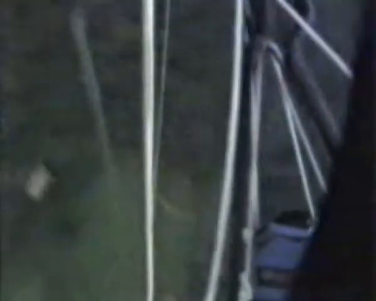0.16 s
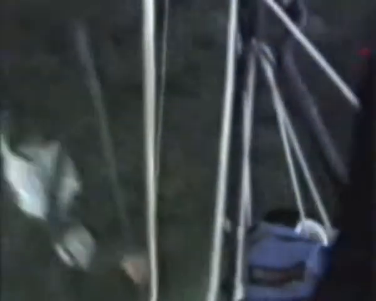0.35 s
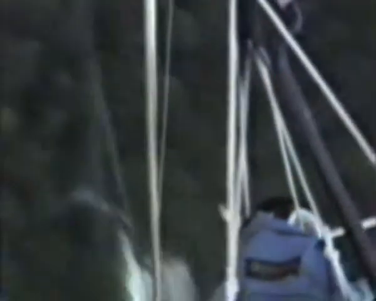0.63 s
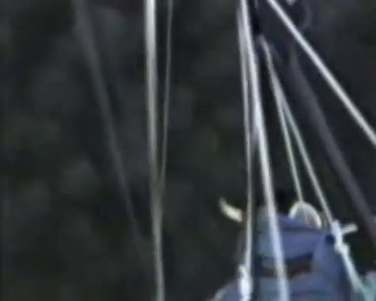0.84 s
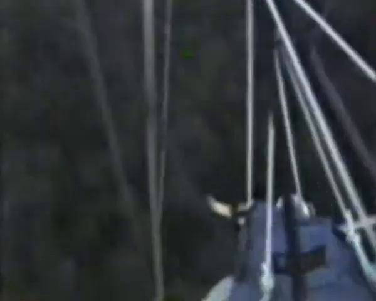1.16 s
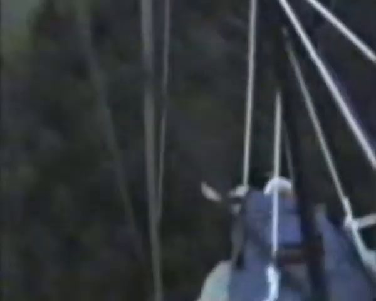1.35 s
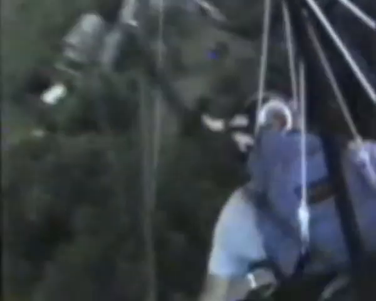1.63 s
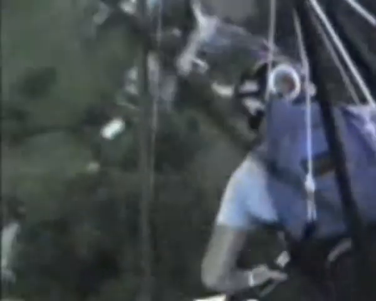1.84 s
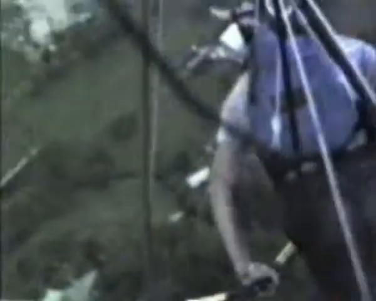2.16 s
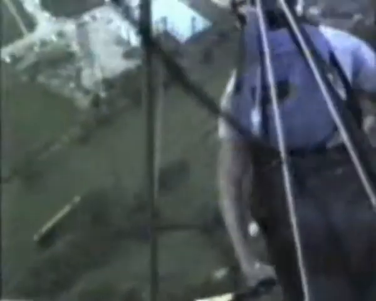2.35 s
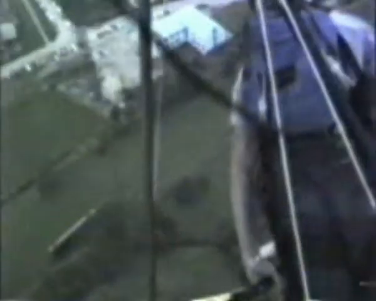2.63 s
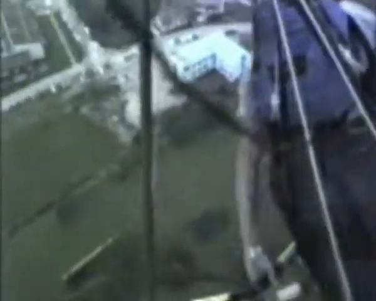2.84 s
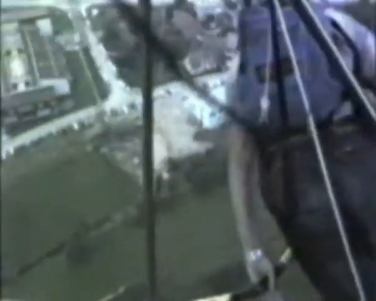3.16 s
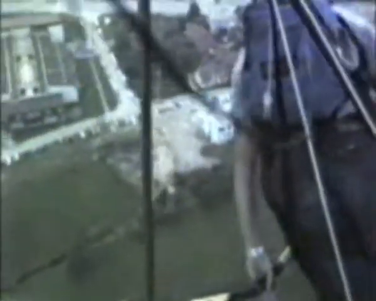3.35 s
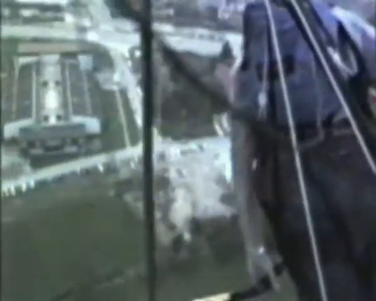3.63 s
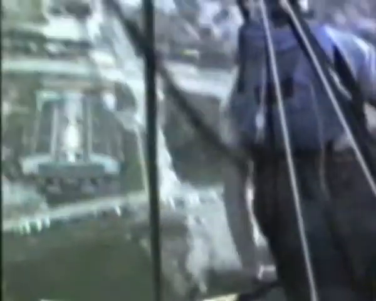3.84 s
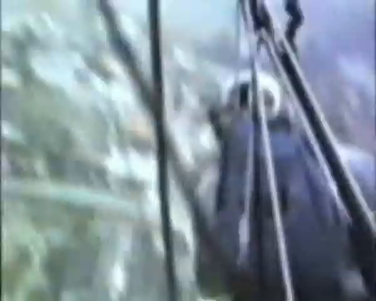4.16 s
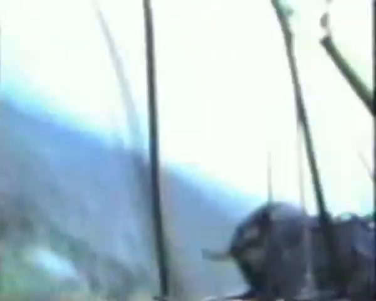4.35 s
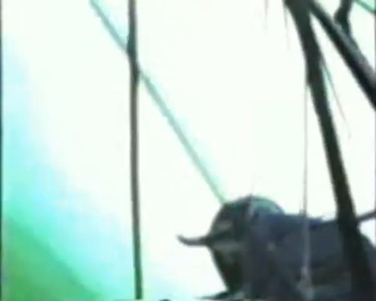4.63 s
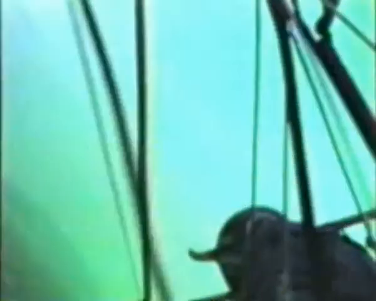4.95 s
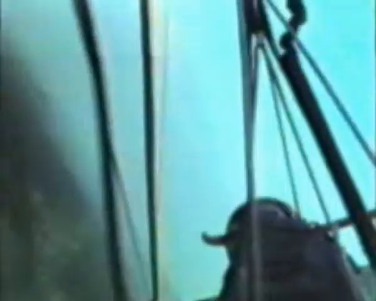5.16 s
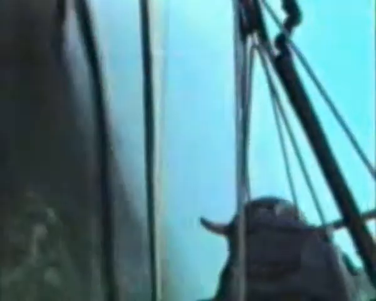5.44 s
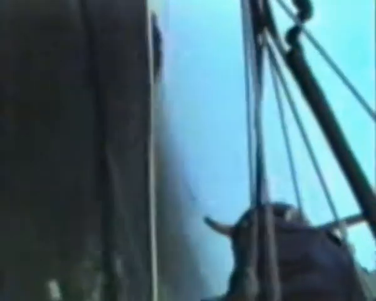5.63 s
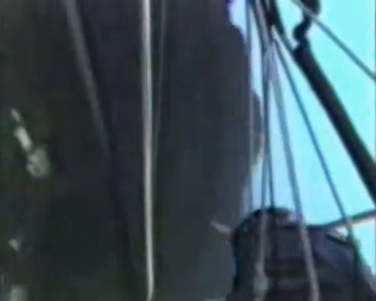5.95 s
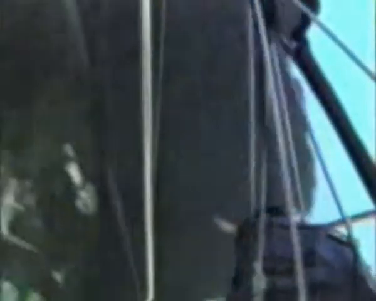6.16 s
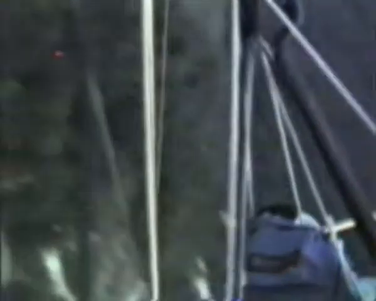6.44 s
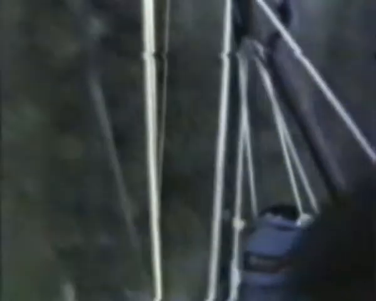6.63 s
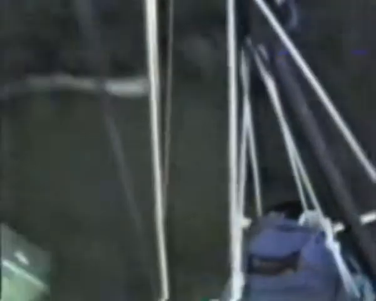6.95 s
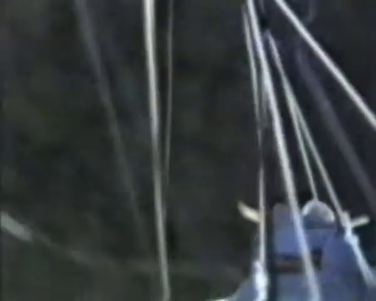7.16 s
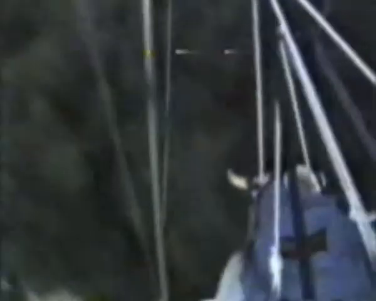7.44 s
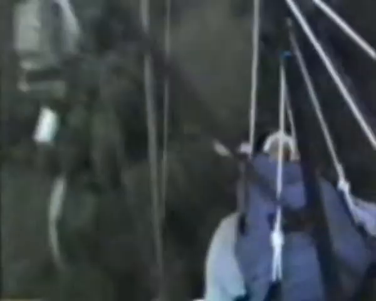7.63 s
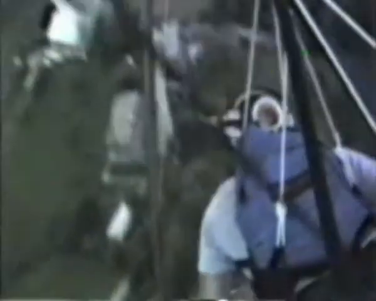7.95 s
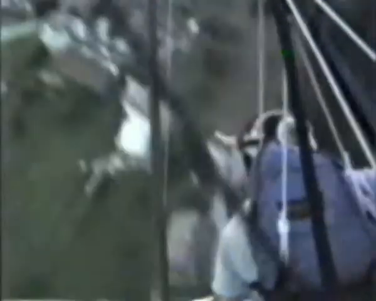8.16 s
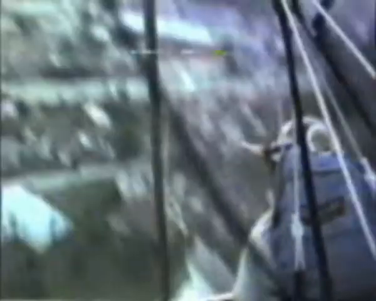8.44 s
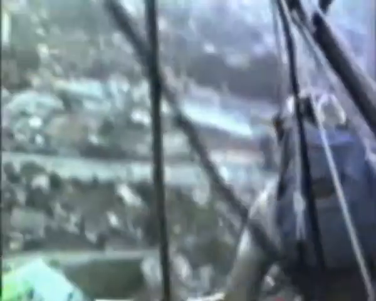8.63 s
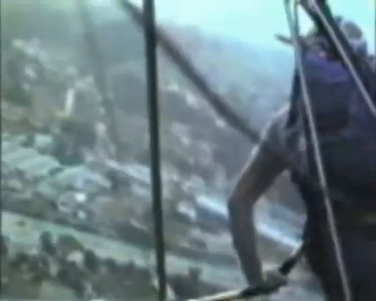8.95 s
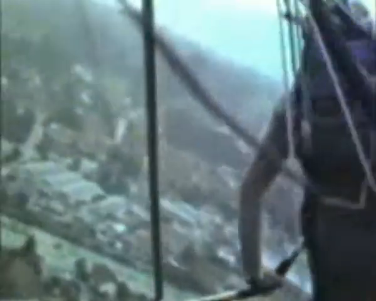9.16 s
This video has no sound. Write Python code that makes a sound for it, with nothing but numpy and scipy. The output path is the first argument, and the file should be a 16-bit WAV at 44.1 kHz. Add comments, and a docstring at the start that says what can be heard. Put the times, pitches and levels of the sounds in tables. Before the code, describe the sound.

Close, narrow-band rushing air, left channel only, flutters in fast irregular bursts. It grows brighter after three seconds, dulls near five, then a short hollow whistle catches while the low roar drops away. Breathy howling follows and the wind brightens again to the end. Open air, slightly overloaded microphone, with an almost silent, faintly hissing right side.

```python
"""On a hang glider swinging through steep turns, wind rushes over a microphone fixed to the frame.
Four bands of noise make the wind: eddies buffet the microphone and the rush brightens with airspeed.
Loose howls are noise around a gliding pitch; whistles on the rigging are wavering sines with weak overtones.
Wind, hiss and two ticks are on the left; the right has faint hiss, a faint whine and one click."""
import sys
import numpy as np
from scipy import signal
from scipy.fft import rfft, irfft
from scipy.io import wavfile
from scipy.ndimage import map_coordinates

SR = 44100
rng = np.random.default_rng(int(sys.argv[2]) if len(sys.argv) > 2 else 0)


def inscribe(sig):
    """Save sig as 16-bit PCM at rate SR to the path in sys.argv[1].

    A 1-D sig is mono; a 2-D sig holds one channel per row.
    Samples are clipped to [-1, 1] before scaling.
    """
    pcm = np.round(np.clip(np.atleast_2d(sig).T, -1, 1) * 32767)
    wavfile.write(sys.argv[1], SR, pcm.astype(np.int16))


N = 410130
TIME = np.arange(N) / SR  # seconds
BINS = np.maximum(np.arange(N // 2 + 1) * SR / N, 1)  # Hz


def from_db(db):
    """Decibels to gain."""
    return 10 ** (np.asarray(db) / 20)


def rms_one(x):
    """Scale to unit power."""
    return x / np.sqrt(np.mean(x ** 2) + 1e-20)


def in_time(points):
    """One value per sample from (seconds, value) points joined by straight lines."""
    seconds, values = np.transpose(points)
    return np.interp(TIME, seconds, values)


def colour(points):
    """Gain at every frequency from (Hz, dB) points."""
    hz, db = np.transpose(points)
    return from_db(np.interp(np.log(BINS), np.log(hz), db))


def below(edge_hz, order):
    """Gain of a low-pass at every frequency."""
    return 1 / np.sqrt(1 + (BINS / edge_hz) ** (2 * order))


def above(edge_hz, order):
    """Gain of the matching high-pass."""
    return 1 / np.sqrt(1 + (edge_hz / BINS) ** (2 * order))


def shaped(x, gains):
    """Filter by a gain at every frequency."""
    return irfft(rfft(x) * gains, N)


def noise(gains, strength=1):
    """Noise of the given rms strength, coloured by the gains."""
    return shaped(strength * rng.standard_normal(N), rms_one(gains))


def drift(rate_hz):
    """Random wandering up to the given rate, without its slowest swings; spread 1."""
    return noise(below(rate_hz, order=2) * above(2.8, order=2))


def swell(peak_s, attack_s, release_s, first_hz, last_hz, peak_db, bend):
    """Pitch and gain of an air tone that grows and fades as it glides, later and faster with more bend."""
    start_s, end_s = peak_s - attack_s, peak_s + release_s
    progress = np.interp(TIME, [start_s, end_s], [0, 1])
    pitch_hz = first_hz + (last_hz - first_hz) * progress ** bend
    gain = from_db(peak_db) * np.interp(TIME, [start_s, peak_s, end_s], [0, 1, 0])
    return pitch_hz, gain


def airflow():
    """Levels in dB of rumble, buffeting, rush and bright edge: large eddies hardly change, small ones do."""
    # Airspeed through the turns, heard as the wind's bright edge. Each row: time in seconds, level in dB.
    airspeed = [(0, -47), (.6, -44), (1.0, -42.5), (1.5, -43.5), (2.35, -44.5), (2.75, -40.5),
                (3.03, -41.5), (3.22, -36.5), (4.3, -37), (4.75, -46.5), (5.5, -47.5), (6.05, -46),
                (6.55, -40), (7.1, -39.5), (7.35, -42), (7.8, -38), (8.9, -37), (9.3, -40)]
    # The midrange rush past the microphone. Each row: time in seconds, level in dB.
    rush_curve = [(0, -27), (.9, -26.0), (1.5, -30), (2.3, -32), (3.03, -28), (3.25, -26.6), (4.25, -24.8),
                  (4.85, -27.5), (5.7, -27), (6.25, -23.5), (6.8, -25.5), (8.0, -27), (8.75, -24),
                  (9.3, -26)]
    edge_db, rush_db = in_time(airspeed), in_time(rush_curve)
    speed_swing = edge_db - np.mean(edge_db)
    rush_swing = rush_db - np.mean(rush_db)

    # the flow briefly runs smoothly past the microphone and the low roar thins
    start_s, attack_s, hold_s, release_s = 5.55, 0.074, .36, .32
    corners_s = np.cumsum([start_s, attack_s, hold_s, release_s])
    smooth = np.interp(TIME, corners_s, [0, 1, 1, 0])

    # the buffeting follows a share of the upper bands' swing;
    # the rumble leans the other way, swelling as the rush sinks
    rumble_db = -29.0 - 0.33 * rush_swing - 7.5 * smooth
    buffet_db = -21 + 0.17 * speed_swing + 0.21 * rush_swing - 4.5 * smooth

    # small random gusts, separate in each size of eddy
    gust_rate_hz, gust_db = 2.6, 0.53
    levels_db = (rumble_db, buffet_db, rush_db, edge_db)
    return [level_db + gust_db * drift(gust_rate_hz) for level_db in levels_db]


def wind(rumble_db, buffet_db, rush_db, edge_db):
    """Large eddies rumble evenly; small ones are shed in bursts that make the upper bands flutter together."""
    # Long-term colour of the wind, scaled anew in each band.
    # Each row: frequency in Hz, relative level in dB per Hz.
    wind_colour = [(25, -60.5), (60, -55), (85, -42.5), (120, -25), (170, -11.5), (230, -3.5), (310, 1),
                   (420, 0.77), (600, -3.5), (1000, -10), (1600, -18), (2400, -27.5), (3400, -37.5),
                   (5200, -55)]
    rumble_top_hz, buffet_top_hz, rush_top_hz = 280.5, 701, 1777
    eddies = rms_one(drift(28) + 1.85 * drift(270))

    def turbulence(zone, level_db, burst_db, own_db):
        """One band of noise that flutters with the shared eddies and a little on its own."""
        flutter = rms_one(from_db(burst_db * eddies + own_db * drift(60)))
        return noise(colour(wind_colour) * zone, from_db(level_db) * flutter)

    def between(low_hz, high_hz):
        """Gain of a band-pass at every frequency."""
        return above(low_hz, order=6) * below(high_hz, order=6)

    rumble = turbulence(below(rumble_top_hz, order=6), rumble_db, burst_db=0.04, own_db=-0.34)
    buffet = turbulence(between(rumble_top_hz, buffet_top_hz), buffet_db, burst_db=2.5, own_db=0.84)
    rush = turbulence(between(buffet_top_hz, rush_top_hz), rush_db, burst_db=3.0, own_db=0.48)
    edge = turbulence(above(rush_top_hz, order=6), edge_db, burst_db=3.0, own_db=0.5)
    return rumble + buffet + rush + edge


def live_hiss(edge_db):
    """Fine hiss under the wind that swells a little with its bright edge."""
    # Colour of the hiss. Each row: frequency in Hz, relative level in dB per Hz.
    hiss_colour = [(100, -5.5), (4000, -4), (6500, 3.5), (8000, 2.5)]
    level_db = -59.5 + 0.32 * (edge_db - np.mean(edge_db)) + 1.1 * drift(120)
    return noise(colour(hiss_colour) * below(9000, order=8), from_db(level_db))


def howl(event, bend, half_width_hz):
    """A turbulent wake sheds vortices loosely around one rate, which glides as the glider turns."""
    centre_hz, gain = swell(*event, bend)
    phase = 2 * np.pi * np.cumsum(centre_hz) / SR
    spread = below(half_width_hz, order=2)
    return gain * (noise(spread) * np.cos(phase) + noise(spread) * np.sin(phase))


def wake_howls():
    """Breathy howls from the wakes of frame and rigging, with their lows taken out."""
    # Each row: peak time in seconds, attack in seconds, release in seconds,
    # first pitch in Hz, last pitch in Hz, rms level at the peak in dB ahead of the low cut.
    howls = [(.57, 0.26, .53, 1158, 1213, -34.5), (3.371, 0.12, .18, 720, 563, -29),
             (5.679, .1, .85, 889, 1403, -24.5), (6.45, .35, .45, 440.7, 525, -22),
             (6.52, .27, .8, 1518, 1370, -33.5)]
    total = sum(howl(event, bend=1.9, half_width_hz=130) for event in howls)
    return shaped(total, above(250, order=6))


def whistle(event, bend, waver, waver_hz, flutter_db, overtone_db):
    """Vortices leave a wire at a rate that wavers with the turbulent air; each overtone is weaker by a step."""
    # A whistle catches and surges. Each row: time of the surge in seconds, gain in dB.
    surges = [(5.697, 18), (5.775, 3)]
    surge_s = 0.016
    pitch_hz, gain = swell(*event, bend)
    wavering_hz = pitch_hz * (1 + waver * drift(waver_hz))
    phase = 2 * np.pi * np.cumsum(wavering_hz) / SR
    tone = sum(from_db(k * overtone_db) * np.sin((k + 1) * phase) for k in range(3))
    fluttering = rms_one(tone * from_db(flutter_db * drift(60)))
    surge_db = sum(db * np.exp(-((TIME - s) / surge_s) ** 2) for s, db in surges)
    return gain * from_db(surge_db) * fluttering


def rigging_whistles():
    """Air whistling on wires, first thin and high, then hollow."""
    # Each row: peak time in seconds, attack in seconds, release in seconds,
    # first pitch in Hz, last pitch in Hz, level at the peak in dB ahead of flutter and surges.
    whistles = [(2.8, 1.2, .28, 5200, 5960, -62.5), (5.82, 0.19, 0.15, 877, 906, -24.5)]
    thin, hollow = whistles
    wires = whistle(thin, bend=.9, waver=0.034, waver_hz=400, flutter_db=5.5, overtone_db=-41)
    wires += whistle(hollow, bend=3.7, waver=.03, waver_hz=90, flutter_db=-0.5, overtone_db=-20.5)
    return wires


def ticks(decay_s=0.0038):
    """Tiny bright snaps of noise that die within milliseconds."""
    # Each row: time in seconds, relative strength in dB.
    tick_list = [(2.9144, -35), (5.9144, -54)]
    strength = 0
    for start_s, db in tick_list:
        strength += from_db(db) * (TIME >= start_s) * np.exp(-np.abs(TIME - start_s) / decay_s)
    return noise(above(3000, order=2) * below(8000, order=4), .4 * strength)


def scene():
    """Everything heard at the one microphone, on the left; the right is still empty."""
    rumble_db, buffet_db, rush_db, edge_db = airflow()
    air = wind(rumble_db, buffet_db, rush_db, edge_db)
    left = air + live_hiss(edge_db) + wake_howls() + rigging_whistles() + ticks()
    return np.array([left, np.zeros(N)])


def limiter(x, threshold_db, follow_s):
    """Gain drops for a moment whenever the running level passes the threshold."""
    keep = np.exp(-1 / (follow_s * SR))
    power = signal.lfilter([1 - keep], [1, -keep], x ** 2)
    gain = (1 + (power / from_db(threshold_db) ** 2) ** 2) ** (-1 / 4)
    return x * shaped(gain, below(77, order=4))


def overload(x, ceiling_db):
    """The tallest peaks are rounded off; the grit this makes has no deep bass."""
    ceiling = from_db(ceiling_db)
    grit = ceiling * np.tanh(x / ceiling) - x
    return x + shaped(grit, above(170, order=4))


def coarse_sampling(live, rate_hz):
    """Coarse samples joined by straight lines mirror a trace of the wind into the top octave."""
    instants_s = np.arange(0, N / SR, 1 / rate_hz)
    samples = map_coordinates(live, [instants_s * SR], order=3, mode="nearest")
    return np.interp(TIME, instants_s, samples)


def idle_channel():
    """Faint coloured hiss and steady sine whines on the unused channel."""
    # Colour of the hiss. Each row: frequency in Hz, relative level in dB per Hz.
    hiss_colour = [(20, 8), (60, -1.5), (300, -0.5), (1000, -1.5), (3000, -3.5), (6000, -9), (10000, -16.5),
                   (14000, -31.5)]
    # Faint whine. Each row: frequency in Hz, level in dB rms.
    whines = [(599, -78.5), (1480, -81)]
    whine = sum(from_db(db) * np.sqrt(2) * np.sin(2 * np.pi * hz * TIME) for hz, db in whines)
    return noise(colour(hiss_colour), from_db(-64)) + whine


def contact_click(left):
    """A momentary contact closes with a sharp step, spills the left channel over and lets go softly."""
    contact_s, length_s = 4.9049, .0033
    since = TIME - contact_s
    # fully closed for three quarters of its length, then a ramp to nothing
    contact = (since >= 0) * np.clip(4 * (1 - since / length_s), 0, 1)
    step = from_db(-14.5) * np.exp(-np.abs(since) / 0.00029)
    spill = .7 * left * (1 - np.exp(-np.abs(since) / 0.00024))
    return contact * (spill + step)


def record(dry):
    """A narrow-band recorder feeds the left channel; a momentary contact spills it into the idle right one."""
    live = limiter(from_db(1.0) * dry[0], threshold_db=-15.0, follow_s=0.0033)
    live = shaped(overload(live, ceiling_db=-1.5), below(7370, order=22))
    left = coarse_sampling(live, rate_hz=16000)
    left = shaped(left, colour([(10500, 0), (13500, 2.5)]))  # slight treble lift
    right = idle_channel() + contact_click(left)
    return np.array([shaped(channel, below(15700, order=90)) for channel in (left, right)])


dry = scene()
out = record(dry)
inscribe(out)
```